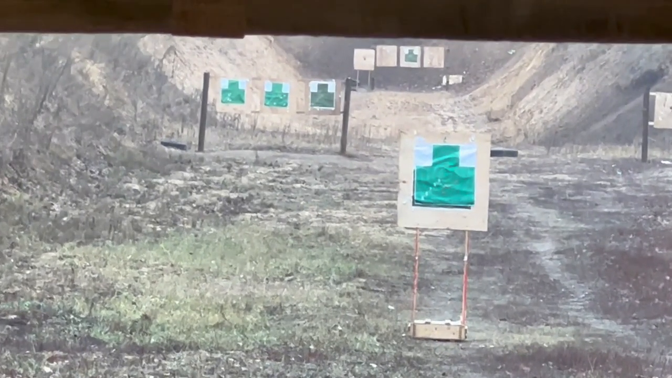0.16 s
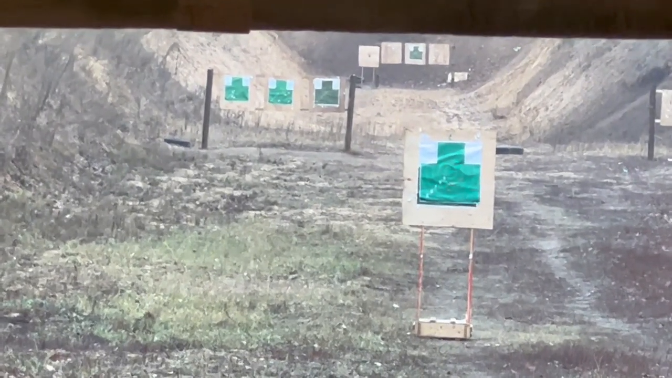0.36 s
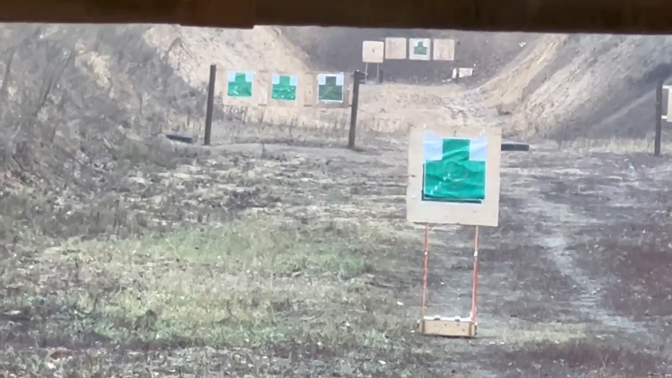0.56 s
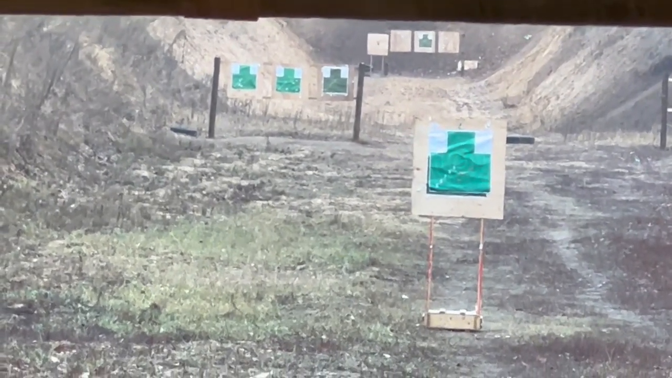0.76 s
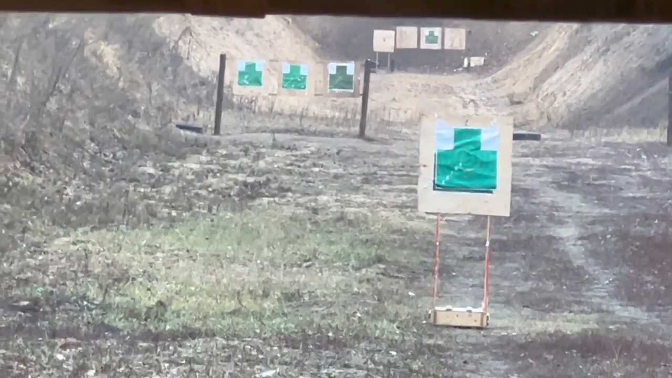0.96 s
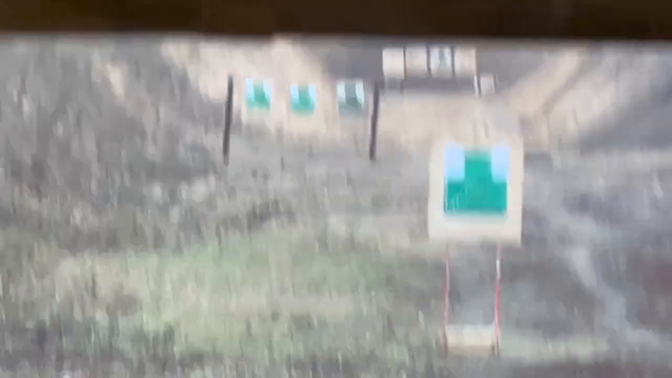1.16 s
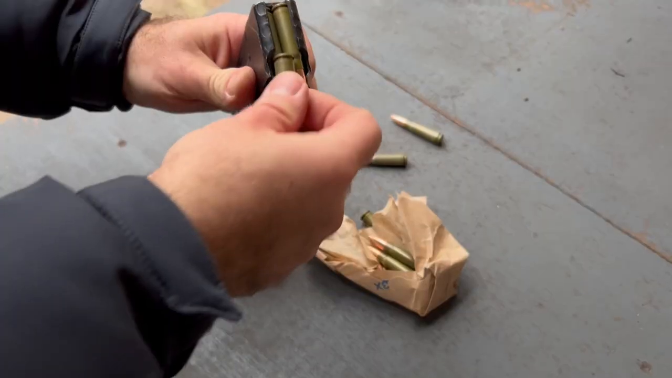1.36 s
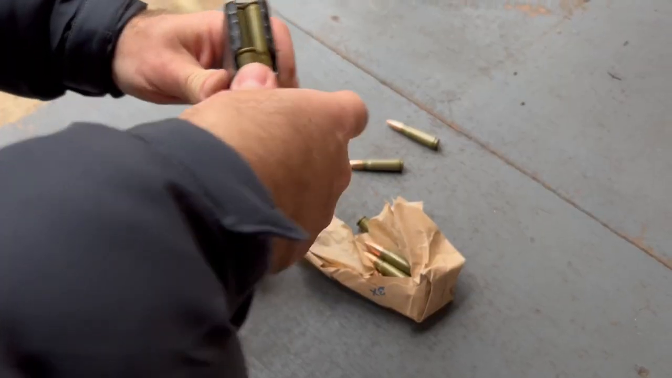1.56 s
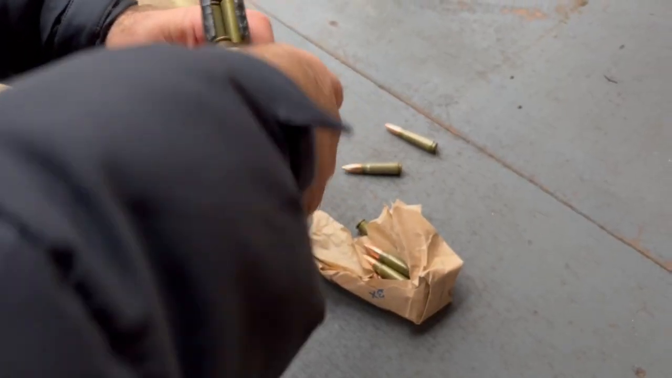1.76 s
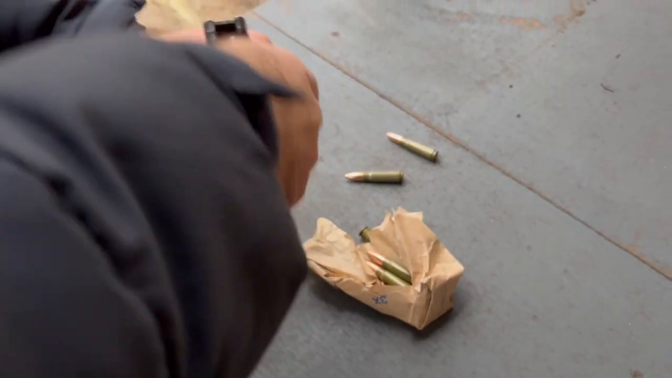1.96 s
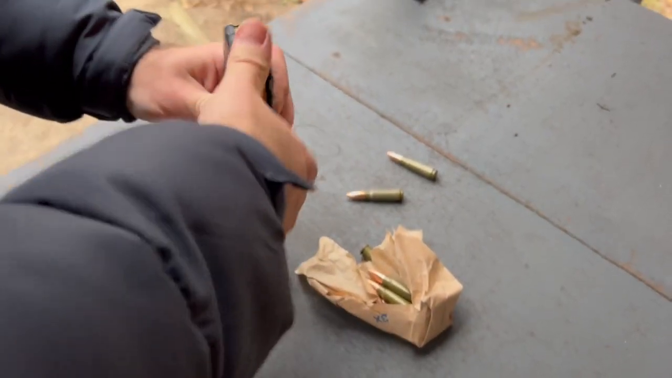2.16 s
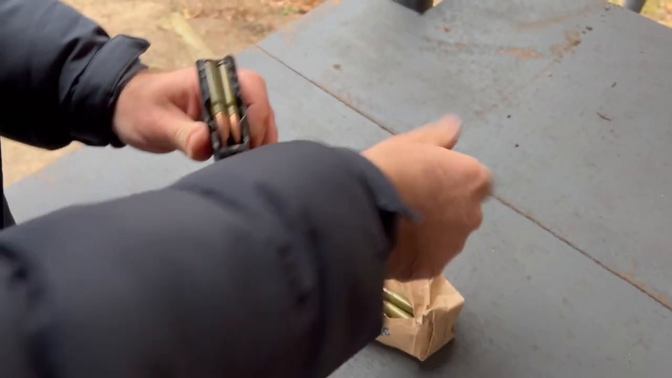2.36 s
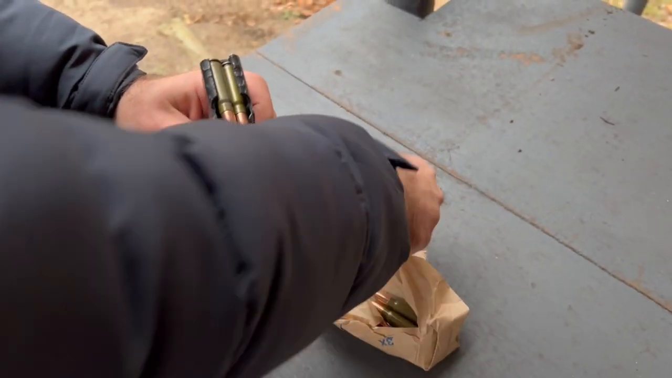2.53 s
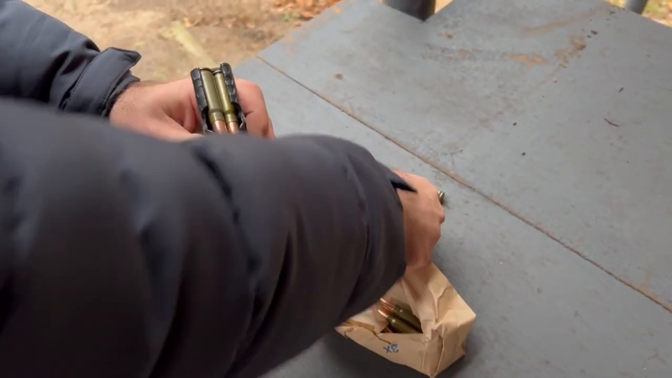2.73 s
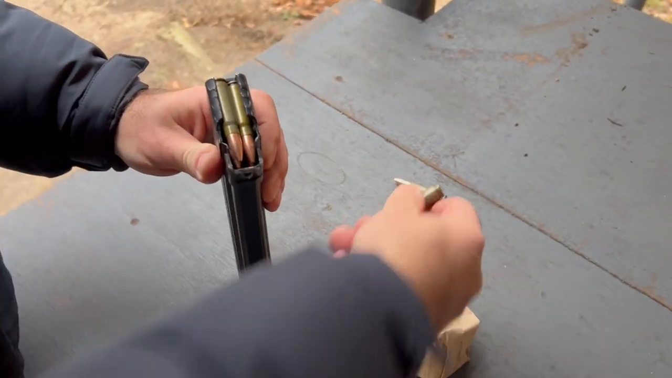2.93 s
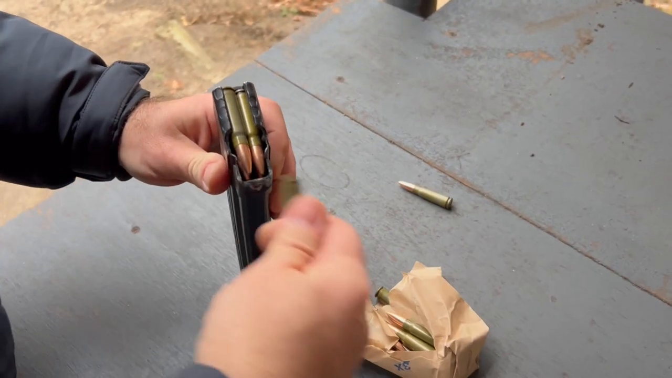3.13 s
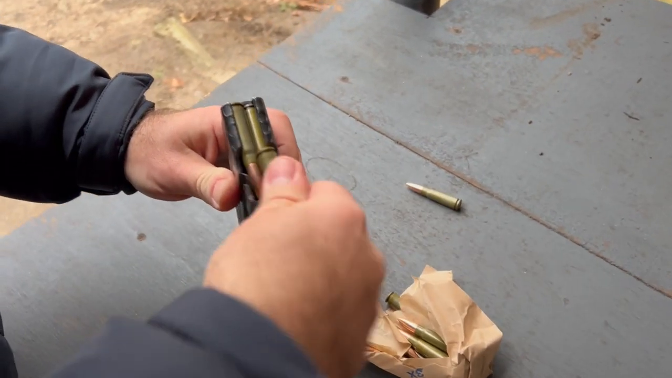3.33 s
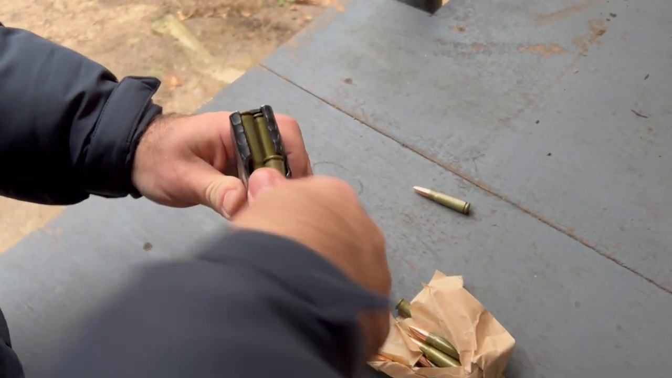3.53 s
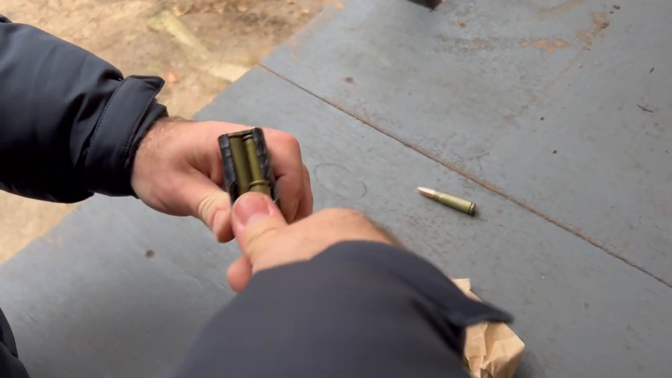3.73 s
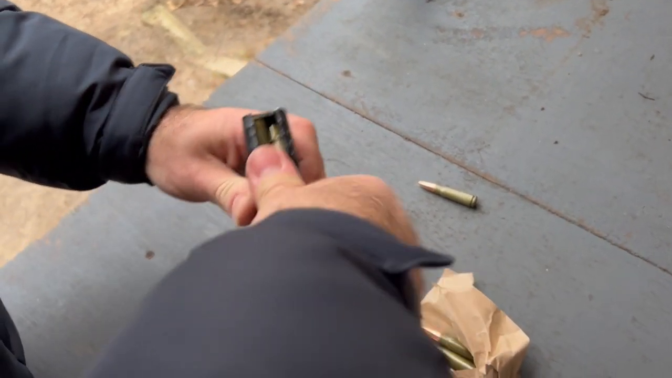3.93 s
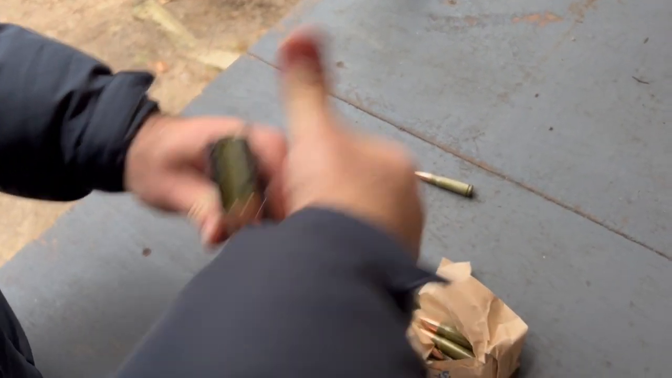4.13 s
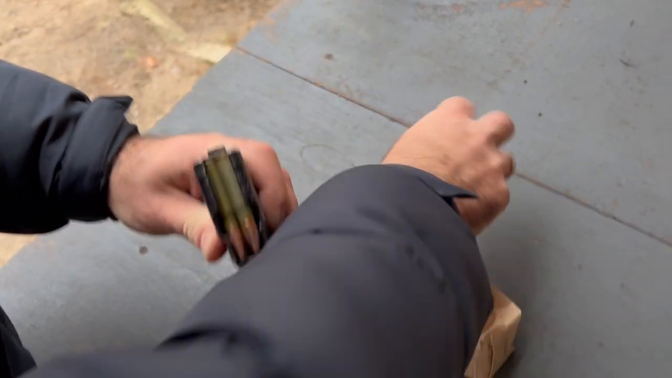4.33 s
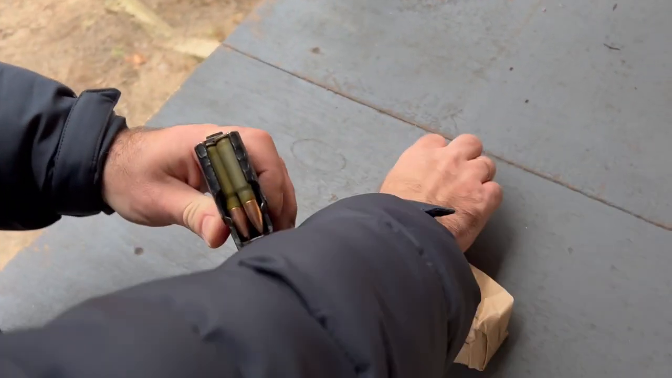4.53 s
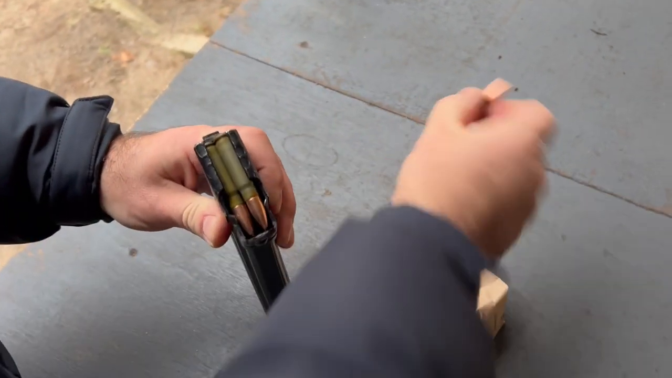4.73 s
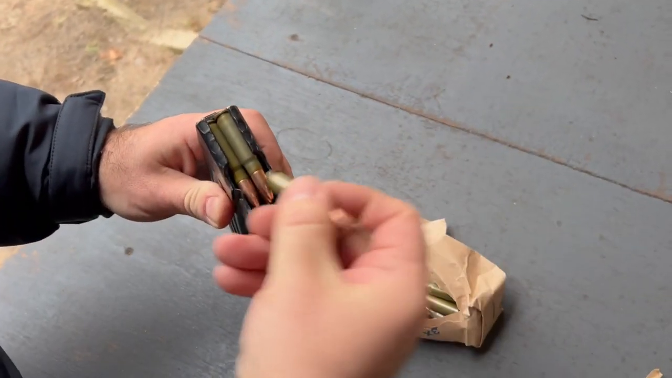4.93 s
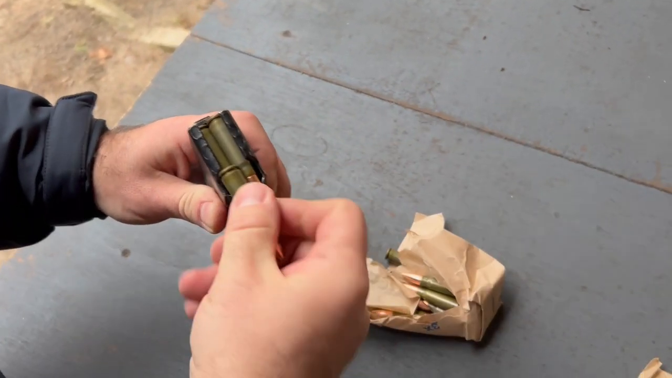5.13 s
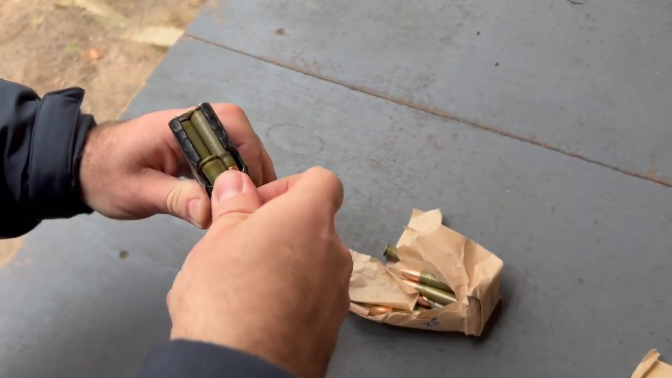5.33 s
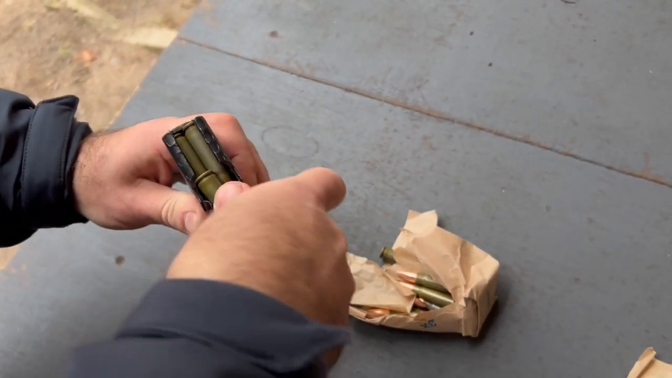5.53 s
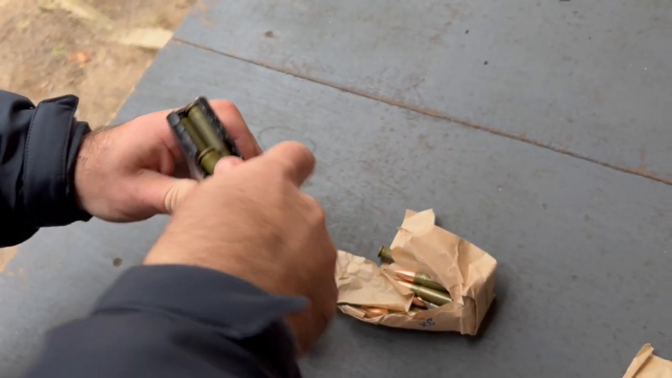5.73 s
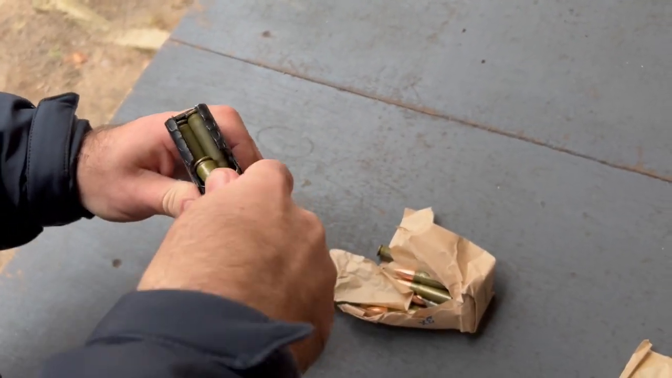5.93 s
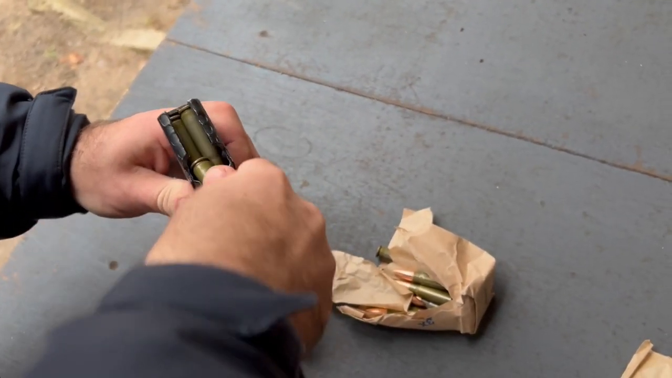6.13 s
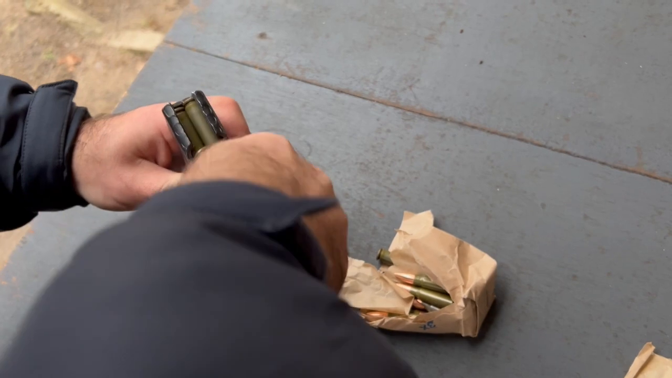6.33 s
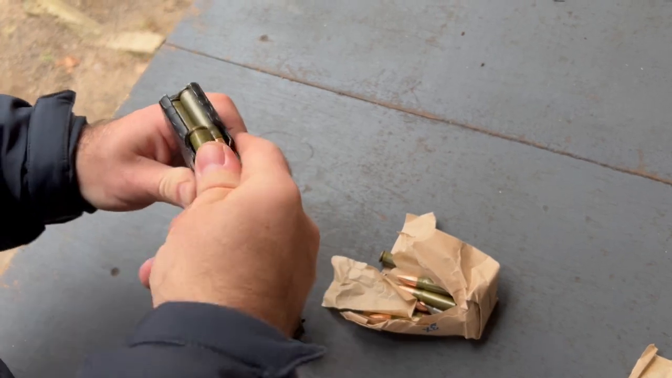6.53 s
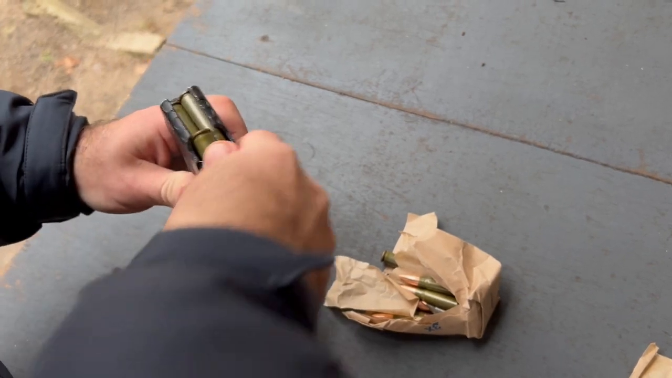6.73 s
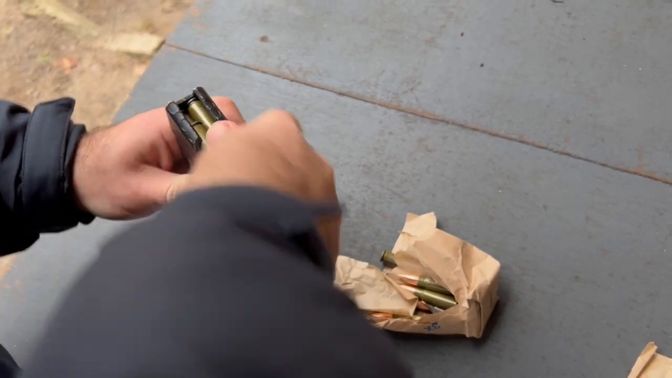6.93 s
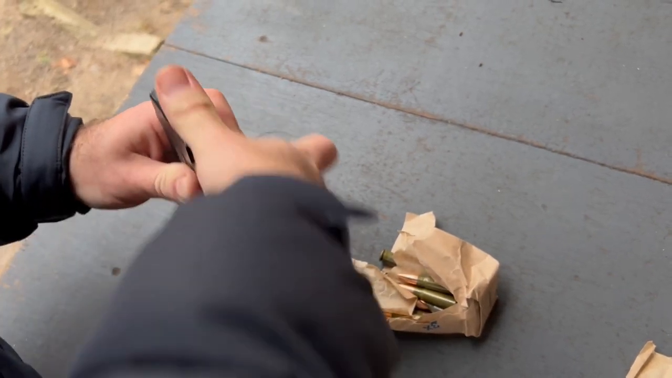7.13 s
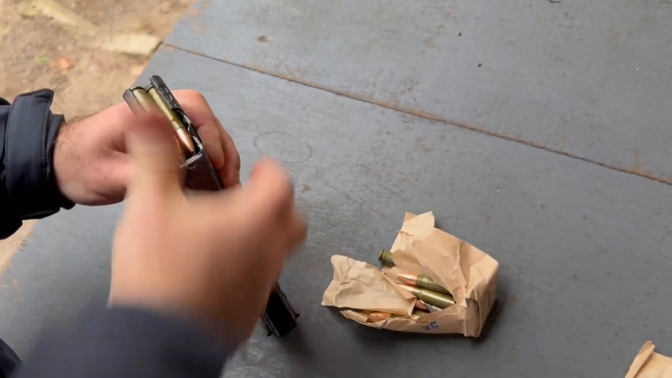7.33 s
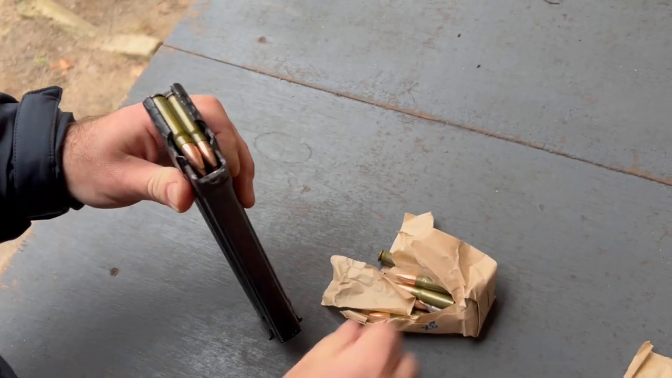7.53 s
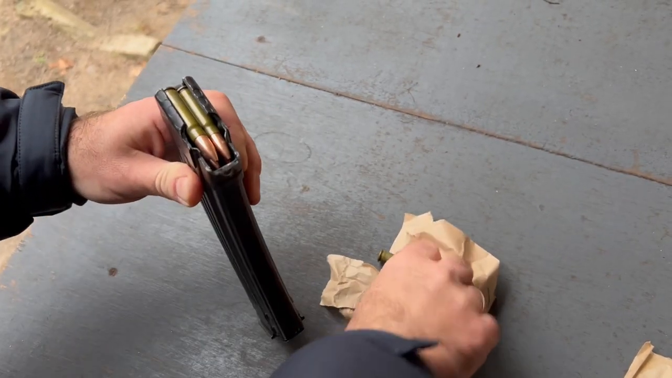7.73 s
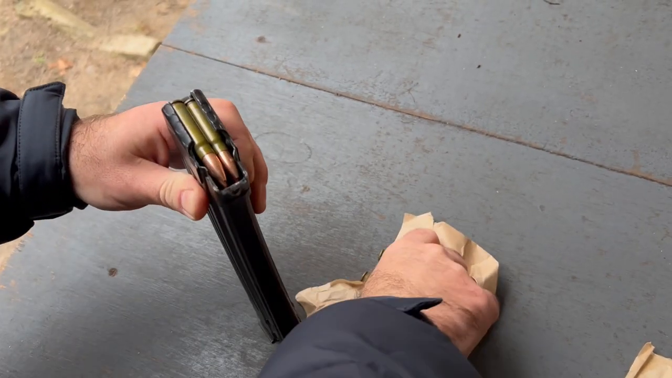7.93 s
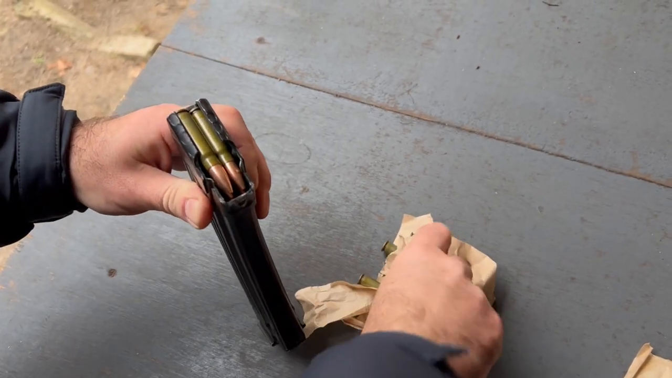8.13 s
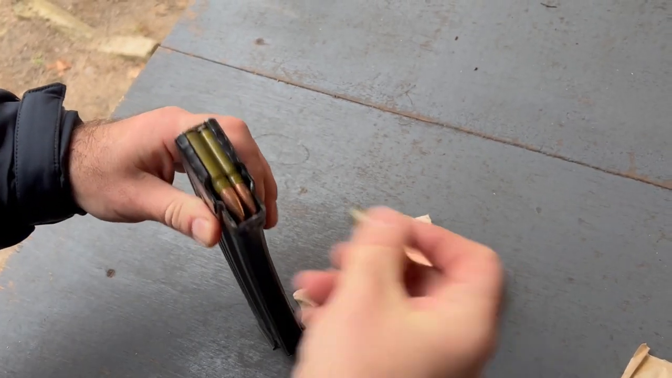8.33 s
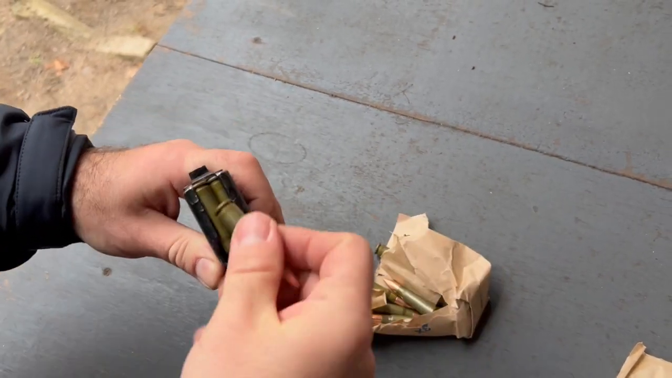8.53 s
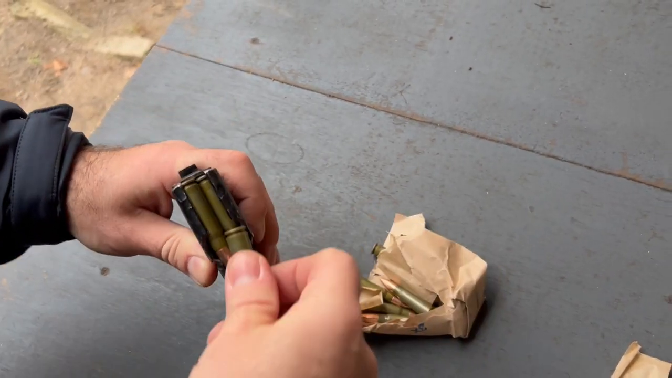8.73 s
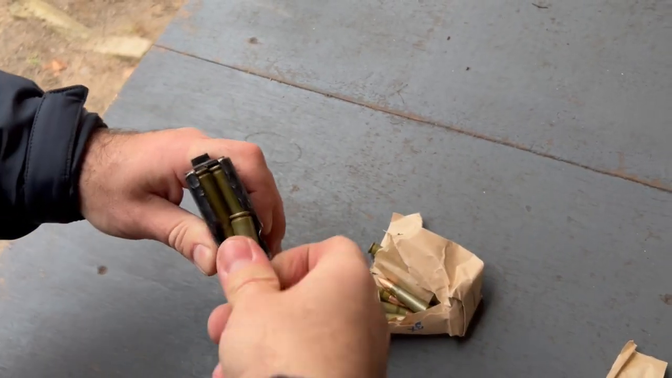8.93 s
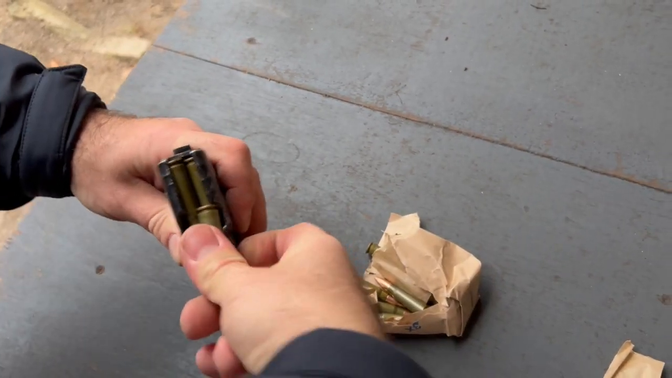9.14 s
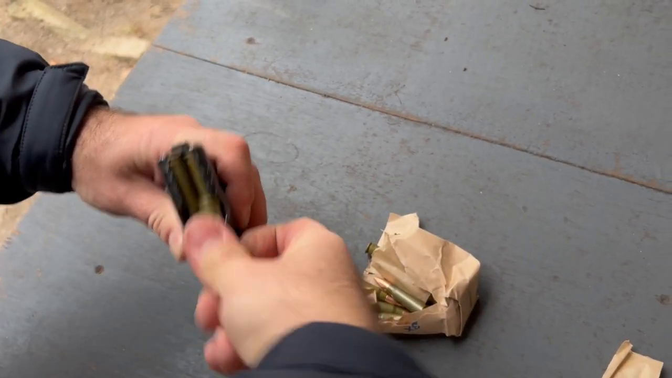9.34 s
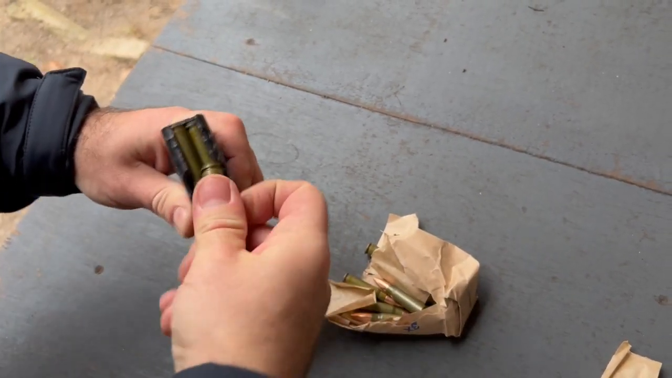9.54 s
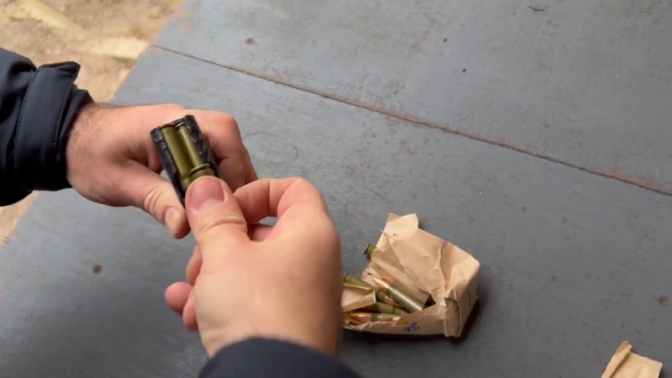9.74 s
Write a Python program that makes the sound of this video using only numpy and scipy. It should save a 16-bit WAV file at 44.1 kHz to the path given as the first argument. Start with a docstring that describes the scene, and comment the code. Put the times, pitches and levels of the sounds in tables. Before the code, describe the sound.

Over a second of near silence holds three faint dull knocks, then cuts abruptly to close handling: brass rounds click and scrape into a steel magazine, with soft thuds on a metal bench and sleeve rustle. A paper packet crackles briefly. A nearby rifle shot overloads the microphone and rolls off earth banks. Loading resumes, with louder paper crackling and more clicks. Close stereo microphone outdoors.

```python
"""Cartridges are thumbed into a steel magazine on a sheet-metal bench at an outdoor range.
Low rumble and sleeve rustle (shaped noise) lie under everything, very faint while three dull knocks sound.
Then brass clicks on steel (tiny knocks set shell tones ringing), the bench thuds (ringing plate tones),
a paper packet crackles (creased panels snap) and things drag (bands of hiss). A rifle shot nearby (pressure
waves and noise) overloads the microphone and rolls back off the earth banks, with a bright tick; loading goes on."""
import sys
import numpy as np
from scipy import signal
from scipy.fft import rfft, irfft, next_fast_len
from scipy.io import wavfile
from scipy.ndimage import uniform_filter1d

SR = 44100
rng = np.random.default_rng(int(sys.argv[2]) if len(sys.argv) > 2 else 0)


def store_wav(level_fs):
    """Save 16-bit WAV to argv[1]."""
    pcm = np.round(np.clip(np.atleast_2d(level_fs), -1, 1) * 32767)
    wavfile.write(sys.argv[1], SR, pcm.T.astype(np.int16))


def voltage_ratio(decibels):
    """Convert decibels (scalar or array-like) to amplitude ratios, 20 dB per decade."""
    exponent = np.asarray(decibels, float) / 20
    return 10 ** exponent


N = 431298   # length in samples
HZ = np.maximum(np.fft.rfftfreq(next_fast_len(N + N % 2), 1 / SR), 1)   # frequencies of the whole-length filters


def rms_one(x):
    """Scale to unit rms, so that a level set afterwards means the same for any noise."""
    return x / np.sqrt(np.mean(x ** 2) + 1e-20)


def noise():
    """White noise: every frequency equally strong."""
    return rng.standard_normal(N)


def in_time(rows, outside=None):
    """Join the points of a curve with straight lines, one value per sample."""
    s, *columns = np.transpose(rows)
    return [np.interp(np.arange(N) / SR, s, c, left=outside, right=outside) for c in columns]


def at_hz(points, hz):
    """Read a table on a log-frequency axis, closer to how we hear pitch."""
    table = np.array(points)
    return np.interp(np.log(hz), np.log(table[:, 0]), table[:, 1])


def filtered(x, response):
    """Change the strength and phase of each frequency in HZ."""
    size = next_fast_len(N + N % 2)
    return irfft(rfft(x, size) * response, size)[:N]


def coloured(x, spectrum):
    """Give a noise-like signal a spectrum."""
    return filtered(x, voltage_ratio(at_hz(spectrum, HZ)))


def band_pass(x, low_hz, high_hz, order=2):
    """Keep mainly the sound between two frequencies."""
    sos = signal.butter(order, [low_hz, high_hz], "band", fs=SR, output="sos")
    return signal.sosfilt(sos, x)


def drift(rate_hz):
    """Slow chance wandering with spread 1, drawn every 40 samples; a higher rate wanders faster."""
    r = np.exp(-80 * np.pi * rate_hz / SR)
    luck = rng.standard_normal(N // 40 + 2002)
    slow = signal.lfilter([1], [1, -2 * r, r * r], luck)[2000:]   # leave out the filter's start-up
    return np.interp(np.arange(N) / 40, np.arange(len(slow)), rms_one(slow))


def ring(drive, hz, t60):
    """A unit click sets a sine of height 1 ringing; it falls by 60 dB in t60 seconds."""
    r, w = voltage_ratio(-60 / (t60 * SR)), 2 * np.pi * hz / SR
    return signal.lfilter([0, np.sin(w)], [1, -2 * r * np.cos(w), r * r], drive + 1e-18)


def struck(modes, drive, uneven_db, detune):
    """Every blow finds the modes with other strengths and, as grip and load change, at slightly other pitches."""
    t, body = np.arange(drive.shape[1]) / SR, np.zeros(drive.shape)
    for hz, mode_db, t60 in modes:
        luck = rng.standard_normal((len(drive), 2))
        tone = np.sin(2 * np.pi * hz * (1 + detune * luck[:, :1]) * t)
        fading = voltage_ratio(mode_db + uneven_db * luck[:, 1:] - 60 * t / t60)
        body += fading * tone
    return signal.fftconvolve(drive, body, axes=1)


def swarms(lengths_ms, rise):
    """Rows of tiny uneven knocks that swell to a peak at 15 ms and die away."""
    t = np.arange(2048) / SR - .015
    span = np.clip(lengths_ms, .2, 14)[:, None] / 1000
    shape = np.exp(-abs(t) / (np.where(t < 0, rise, .55) * span))
    return shape * rng.standard_normal(shape.shape) * voltage_ratio(3.1 * rng.standard_normal(shape.shape))


def placed(times, rows, levels_db, lengths_ms):
    """Lay rows out in time; a level is held for about the length of the contact."""
    out = np.zeros(N + rows.shape[1])
    held = (lengths_ms + 1.5) / 1000 * SR / 2
    size = voltage_ratio(levels_db) * np.sqrt(held / np.sum(rows ** 2, axis=1))
    for s, row, gain in zip(times, rows, size):
        at = round((s - .015) * SR)   # the row peaks 15 ms in
        out[at:at + len(row)] += gain * row
    return out[:N]


# low rumble, very faint at first, stepping up abruptly at 1.35 s: t/s, level/dB
RUMBLE_LEVEL = [(0, -70), (.3, -81), (1.335, -76.5), (1.35, -49), (2.0, -42), (3.2, -52), (4.4, -39.5),
                (4.9, -51), (6.0, -54.5), (7.0, -35), (7.6, -48), (8.7, -44.5), (9.1, -47.5), (9.78, -50.5)]
# its relative spectrum: f/Hz, level/dB
RUMBLE_COLOUR = [(30, -8.5), (70, 0), (200, -8), (400, -21.5), (800, -27), (1500, -27), (3000, -57.5)]


def rumble():
    """Bass-heavy noise whose level wanders slowly."""
    level_db = in_time(RUMBLE_LEVEL)[0] + 2.5 * drift(8)
    return voltage_ratio(level_db) * rms_one(coloured(noise(), RUMBLE_COLOUR))


# fingers and cloth in contact: t/s, level/dB
RUSTLE_LEVEL = [(0, -104), (.5, -92), (1.335, -74), (1.36, -56), (3.22, -60), (3.28, -74.5), (3.5, -58.5),
                (4.6, -71), (5.9, -66), (6.23, -72), (6.38, -59), (7.1, -57.5), (7.52, -59), (8.5, -51.5),
                (9.0, -64.5), (9.3, -64), (9.36, -76), (9.42, -60), (9.78, -61)]
# their relative spectrum: f/Hz, level/dB
RUSTLE_COLOUR = [(300, -20), (600, -9.5), (1100, -11), (1700, -18.5), (2500, -11), (4200, -15), (5000, -16),
                 (5600, -9.5), (8000, -11.5), (11500, -18.5), (13000, -23.5), (16000, -43)]
# a sleeve brushes past: peak t/s, level/dB, half length/s
SWISHES = [(2.376, -59.5, 0.2), (1.8, -56.5, 0.12), (7.406, -48.5, 0.061), (7.64, -52, 0.051)]


def rustle():
    """A bed of cloth and skin noise; each brush of a sleeve swells and fades."""
    t = np.arange(N) / SR
    level = voltage_ratio(in_time(RUSTLE_LEVEL)[0])
    for s, peak_db, half in SWISHES:
        level += voltage_ratio(peak_db) * np.exp(-((t - s) / half) ** 2)
    return level * voltage_ratio(1.2 * drift(20)) * rms_one(coloured(noise(), RUSTLE_COLOUR))


# three quiet, dull knocks, perhaps muffled shots: t/s, level/dB (relative)
KNOCKS = [(0.538, -24), (0.753, -28), (1.008, -19.5)]
# their short tones: f/Hz, level/dB (relative), t60/s
KNOCK_TONES = [(1220, -17, 0.2), (2654, -1, 0.043)]


def dull_knocks():
    """Quiet, dull knocks: a short noise burst, a short tone and a haze of noise behind each."""
    s, knock_db = np.transpose(KNOCKS)
    ms = 3.9 + 0 * s
    drive = np.pad(swarms(ms, rise=.3), [(0, 0), (0, 6000)])
    burst = placed(s, drive, knock_db - 10.5, ms)
    t = np.arange(8000) / SR
    haze_tail = rng.standard_normal(len(t)) * voltage_ratio(-38.0 - 60 * t / 0.18)
    haze = signal.fftconvolve(burst, haze_tail)[:N]
    # the tone of a louder knock is much louder: 4 dB for each dB
    loudest_db = knock_db.max()
    tone_db = loudest_db - 19 + 4.0 * (knock_db - loudest_db)
    tones = struck(KNOCK_TONES, drive, uneven_db=-2, detune=0.0016)
    return band_pass(burst + haze, 1000, 9000) + placed(s, tones, tone_db, ms)


# brass on steel, the clear contacts: t/s, level/dB, treble re level/dB, rattle/ms
CLICKS = [(1.3563, -35, 11, 2.9), (1.3672, -26.5, 4, 3.1), (1.386, -14, -2, 2.2), (1.49, -22.5, -16, 2.4),
          (1.508, -16, -15, 2.7), (1.545, -24, -18, 5.9), (1.5669, -22, -14.5, 3.2),
          (1.6029, -26, -11.5, 14), (1.6183, -16, -11.5, 0.53), (1.654, -25, -19, 2.1),
          (1.689, -15, -12, 1.7), (1.6998, -20.5, -3, 5.5), (1.829, -26, -8.5, 1.8),
          (1.8989, -31, -18, 3.9), (1.921, -10.5, -14.5, 4.5), (1.9318, -9.5, -2.5, 6.4),
          (1.9434, -6, -6.5, 2.2), (1.9608, -7.5, -19.5, 5.9), (2.0321, -23.5, -8.5, 11),
          (2.0843, -17.5, -13, 2), (2.099, -10, -4, 6.2), (2.113, -17, -6, 5.2), (2.151, -23, -11, 2.9),
          (2.1759, -13, -16, 4.9), (2.192, -16, -12.5, 2), (2.276, -18.5, -10.5, 5.7),
          (2.2932, -11.5, 1, 1.2), (3.3334, -28.5, -5, 2.3), (3.355, -37.5, -10, 6),
          (3.3932, -24.5, 2, 2.7), (3.4016, -10.5, 3, 3), (3.415, -22, 1.5, 3), (3.4538, -20.5, -7.5, 1.1),
          (3.473, -18, -11, 3), (3.514, -21, -12, 5.7), (3.5376, -19, -29.5, 4.9),
          (3.5602, -27.5, -16, 2.9), (3.7071, -18.5, 0, 2), (3.8632, -16.5, -8, 4.7), (3.8741, -23, 4, 1.5),
          (3.8816, -13.5, 5.5, 2.6), (5.0786, -31.5, -1, 4.3), (5.0944, -24.5, -7, 2.2),
          (5.175, -27.5, -17.5, 3.4), (5.2406, -35.5, -14.5, 2), (5.297, -25, -4.5, 5.8),
          (5.501, -38, -8, 3), (5.593, -21, -11, 1.9), (5.7176, -40.5, -10, 2), (5.9829, -28.5, -20, 5.3),
          (5.9926, -23, -11, 2.05), (6.042, -24, -6, 1.9), (6.05, -18.5, -5.5, 1.5),
          (6.0612, -19, -7.5, 3.2), (6.1029, -13, -15, 3.9), (6.1774, -33, -17.5, 4.6),
          (6.4304, -19.5, -23.5, 1.8), (6.4693, -23, -11, 3.8), (6.516, -21.5, 1.5, 2.6),
          (6.5315, -20.5, 3, 6.4), (6.5435, -9, -0.5, 6.5), (6.5783, -27, -6, 5.3), (6.6353, -22, -7, 2.5),
          (6.6523, -24.5, -16.5, 5.8), (6.737, -33, -5, 2.8), (6.803, -16, -10, 1.6),
          (6.8282, -17, -6, 3.8), (6.8504, -17.5, -7.5, 8.3), (6.866, -9.5, -7.5, 3.4),
          (6.8804, -7, -3.5, 15), (6.9, -15, -2.5, 1), (6.972, -17.5, -4.5, 3.3), (6.983, -15, -3, 4.8),
          (6.995, -9.5, -5, 3.2), (7.014, -17.5, -9, 4.1), (7.029, -11, -5.5, 1.6),
          (7.0425, -26.5, -15.5, 2.5), (7.1364, -7, -0.5, 1.9), (7.204, -29.5, -5, 2.7),
          (7.234, -24.5, -19, 3.1), (7.2712, -27, -27.5, 1.1), (8.5351, -38, 8.5, 0.98),
          (8.5438, -20, 16.5, 2), (8.5601, -14.5, 5.5, 2.3), (8.7231, -15, -1, 2.4), (8.7341, -10, 2, 4.1),
          (8.7527, -18, -4.5, 7.3), (8.807, -16.5, -13.5, 2.4), (8.8466, -23, -4.5, 1.7),
          (8.86, -32.5, -12, 3), (8.888, -24.5, -13, 5.5), (8.898, -23, -17, 2.7), (8.9235, -11.5, -3.5, 4),
          (8.958, -32.5, 10, 1.5), (9.094, -41.5, -6.5, 6.4), (9.2058, -35, -6.5, 1.6),
          (9.608, -19.5, 5.5, 4.7), (9.6188, -9.5, 1.2, 9.5), (9.6639, -25, -2.5, 1.1),
          (9.708, -19, -7.5, 5.8), (9.7544, -30, -13.5, 4.7)]


def contacts():
    """The clear contacts; after each one the round rocks back once, as a weaker contact."""
    s, level_db, treble_db, ms = np.transpose(CLICKS)
    luck = rng.standard_normal((len(s), 3))
    later = s + 0.011 * np.exp(0.23 * luck[:, 0])   # about 11 ms on
    weaker_db = level_db - 21 + 6.5 * luck[:, 1]
    later_treble_db = -9.5 + 4.0 * luck[:, 2]
    return (np.r_[s, later], np.r_[level_db, weaker_db],
            np.r_[treble_db, later_treble_db], np.r_[ms, 9.1 + 0 * s])


# tones of the magazine shell and follower spring: f/Hz, level/dB (relative), t60/s
MAGAZINE_MODES = [(1207, -3.5, 0.062), (1328, -0.5, 0.019), (1478, 9, 0.012), (2020, -1.5, 0.014),
                  (2407, 6, 0.0089), (2800, -3, 0.0086), (3987, 2.5, 0.0048), (5914, 5.5, 0.0029),
                  (6910, 1.5, 0.0034), (7840, 3.5, 0.0021)]
# air inside the magazine: f/Hz, level/dB (relative), t60/s
HOLLOW = [(509.5, -3, 0.072), (615, -4.5, 0.021), (874, -1.5, 0.021)]


def magazine():
    """Shell modes over a dry clack, upper modes under a bright scratch of brass, a faint hollow knock below."""
    s, level_db, treble_db, ms = contacts()
    drive = swarms(ms, rise=0.5)
    # bright contacts favour the middle tones over the lowest: 0.39 dB for each dB of treble
    tilt = np.sqrt(voltage_ratio(0.39 * (treble_db - treble_db.mean())))[:, None]
    lowest = struck(MAGAZINE_MODES[:3], drive, uneven_db=4.0, detune=.02)
    middle = struck(MAGAZINE_MODES[3:6], drive, uneven_db=4.0, detune=.02)
    shell = lowest / tilt + middle * tilt
    upper = struck(MAGAZINE_MODES[6:], drive, uneven_db=4.0, detune=.03)
    clack = voltage_ratio(26.0) * band_pass(drive, 1100, 3600)
    scratch = voltage_ratio(12.5) * band_pass(drive, 3400, 11000)
    shell[:, :drive.shape[1]] += clack
    upper[:, :drive.shape[1]] += scratch
    steel = placed(s, shell, level_db, ms) + placed(s, upper, level_db + treble_db, ms)
    # a small shell radiates little below its first mode
    thin = np.r_[signal.butter(7, 1090, "high", fs=SR, output="sos"),
                 signal.butter(3, 11500, fs=SR, output="sos")]
    knock = struck(HOLLOW, drive, uneven_db=4.0, detune=0.037)
    knock_db = level_db - 16.0 + rng.normal(0, 5.1, len(s))
    return signal.sosfilt(thin, steel) + placed(s, knock, knock_db, ms)


# relative spectrum of the reflections: f/Hz, level/dB
REFLECTIONS = [(400, -9.5), (950, -18.5), (1250, 7), (1650, -8.5), (2350, -0.5), (4000, -9.5), (5000, -13),
               (6300, -10), (10000, -23), (13000, -41.5)]


def shelter(x):
    """Dense reflections from bench top and roof: noise that follows the energy of the source and dies away."""
    keep = voltage_ratio(-120 / (.13 * SR))   # energy falls by 60 dB in 0.13 s
    energy = signal.lfilter([1 - keep], [1, -keep], x ** 2)
    level = voltage_ratio(-11.0) * np.sqrt(energy) * voltage_ratio(2.9 * drift(70))
    return level * rms_one(coloured(noise(), REFLECTIONS))


# pushes that reach the bench: t/s, level/dB, deep tone re level/dB
THUDS = [(1.566, -25, -6), (1.687, -19, -15), (1.8, -24.5, -11.5), (1.941, -12, -28.5), (2.101, -12, -26),
         (2.152, -21, -14.5), (2.295, -18.5, -43), (3.538, -23.5, -0.5), (3.87, -16, -17),
         (5.594, -23.5, -7.5), (6.102, -15, -3.5), (6.543, -14, -6.5), (6.826, -24, -21.5),
         (6.872, -13, -22), (6.996, -10, -39), (7.336, -31.5, -9), (7.777, -19.5, -8), (8.627, -39.5, 15.5),
         (8.747, -35, 8.5), (8.9, -22.5, -5.5), (9.623, -16.5, -2.5)]
# tones of the bench, deepest first: f/Hz, level/dB (relative), t60/s
BENCH_MODES = [(69.6, -2, 0.36), (140.6, -10.5, 0.35), (216, 4.5, 0.06), (323.3, -14.5, 0.22)]


def bench():
    """Soft pushes knock the top plate at pitches that shift with the load; the deepest mode answers late and wavers."""
    s, push_db, deep_db = np.transpose(THUDS)
    ms = 5.1 + 0 * s
    drive = np.pad(swarms(ms, rise=.3), [(0, 0), (0, 10000)])
    tones = struck(BENCH_MODES[1:], drive, uneven_db=2.5, detune=.07)
    plate = placed(s, tones, push_db - 1.5, ms)
    hz, mode_db, t60 = BENCH_MODES[0]
    push = np.zeros(N)
    late = np.round((s + .009) * SR).astype(int)   # 9 ms late
    push[late] = voltage_ratio(push_db + mode_db + deep_db)
    deep = ring(push, hz, t60) * voltage_ratio(2.9 * drift(24))
    return signal.sosfilt(signal.butter(2, 450, fs=SR, output="sos"), plate + deep)


def small_snaps(level, count):
    """Chance snaps fall where the crinkling is busy and follow its level."""
    share = np.cumsum(np.sqrt(level))
    at = np.searchsorted(share / share[-1], (np.arange(count) + rng.random(count)) / count)
    luck = rng.uniform(-1.2, 1, (count, 3))
    level_db = 20 * np.log10(level[at]) - 1.5 + 4.0 * luck[:, 0]
    treble_db = -2.5 + 5.0 * luck[:, 1]
    pitch_hz = 2500 * 2 ** (.7 * luck[:, 2])
    return np.c_[at / SR, level_db, treble_db, 1.6 + 0 * at, pitch_hz]   # each 1.6 ms long


# the loud paper snaps: t/s, level/dB, treble re level/dB, length/ms, pitch of the creased panel f/Hz
SNAPS = [(2.707, -26.5, -25.5, 1.5, 1460), (2.7256, -33, -21, 2.4, 1940), (2.7836, -37.5, -11, 2.2, 2390),
         (7.748, -38, -10.5, 2.8, 1480), (7.7787, -20.5, -4.5, 13, 2194), (7.808, -25, -8, 3, 3020),
         (7.8243, -27.5, 6.5, 1.2, 3030), (7.8395, -16, -8.5, 1.7, 2820), (7.849, -16.5, 1.5, 1.8, 3020),
         (7.8653, -19.5, -7, 1.2, 2860), (7.902, -35, 2.5, 1.8, 3550), (7.982, -30.5, -2, 2, 3250),
         (8.0197, -19.5, -12.5, 2.7, 3850), (8.0314, -31.5, 2, 2.9, 3890), (8.1304, -35.5, 4, 9.4, 3320),
         (8.187, -35, -4.5, 2.7, 3180), (8.218, -31.5, -3.5, 1.5, 3300), (8.227, -29.5, -19.5, 1.3, 1520),
         (8.279, -36.5, 2, 1.9, 1750)]
# two spells of crinkling, each a curve: t/s, level/dB
CRINKLE = [
    [(2.58, -67.5), (2.65, -36.5), (2.78, -41), (2.8, -52), (2.88, -48.5), (2.92, -69)],
    [(7.74, -49.5), (7.85, -32), (7.94, -52.5), (8.04, -36.5), (8.1, -47), (8.2, -46.5), (8.26, -51),
     (8.45, -56)],
]
# relative spectrum of the crinkling: f/Hz, level/dB
PAPER_COLOUR = [(300, -6.5), (550, -6), (3800, -14), (5000, -19), (6500, -11.5), (10700, -22.5),
                (13000, -24.5), (16000, -53)]


def paper():
    """Lone snaps of creased panels over clumps of small creases."""
    level = sum(voltage_ratio(in_time(span, outside=-140)[0]) for span in CRINKLE)
    snaps = np.r_[SNAPS, small_snaps(level, count=30)]
    s, level_db, treble_db, ms, pitch_hz = np.transpose(snaps)
    drive = swarms(ms, rise=.45)
    # creased panels ring a few cycles
    sheet = [(hz, 4.2 * np.log2(hz / 1000), 13.0 / hz) for hz in np.geomspace(900, 4300, num=7)]
    body = struck(sheet, drive, uneven_db=4.0, detune=.1)
    reach = 2 ** 0.65   # a panel sounds 0.65 octave to either side of its pitch
    body = np.array([band_pass(row, hz / reach, hz * reach) for hz, row in zip(pitch_hz, body)])
    edge = band_pass(drive, 5300, 11500, order=3)
    born = rng.random(N) < 1000 * voltage_ratio(7 * drift(25)) / SR   # chance of a crease, in clumps
    size = voltage_ratio(4.8 * np.minimum(rng.exponential(1, N), 5))
    creases = born * size * rng.choice([-1, 1], N)
    crinkling = level * rms_one(coloured(creases, PAPER_COLOUR))
    return placed(s, body, level_db, ms) + placed(s, edge, level_db + treble_db, ms) + crinkling


# a case slips along the lips, a hand drags on bench or paper:
# start t/s, level/dB, hold/s, centre f/Hz, width/octaves
SLIDES = [(3.576, -35.5, 0.016, 4300, 1.5), (7.768, -30, 0.015, 750, 1.1), (8.025, -40, 0.05, 1000, 1.8),
          (8.135, -41, 0.092, 1500, 1.6), (8.57, -41, 0.14, 4200, 1.1), (8.585, -47, 0.11, 260, 1.0)]


def slide():
    """Something drags over a surface: slightly grainy hiss in one band that starts fast, holds and fades."""
    attack_s, fall_db_per_s = .006, 255
    t, out = np.arange(N) / SR, np.zeros(N)
    grain = noise() * voltage_ratio(4.0 * drift(120))
    for s, level_db, hold, hz, octaves in SLIDES:
        hiss = rms_one(band_pass(grain, hz * 2 ** (-octaves / 2), hz * 2 ** (octaves / 2)))
        start = np.clip((t - s) / attack_s, 0, 1)
        fade = voltage_ratio(level_db - fall_db_per_s * np.maximum(t - s - hold, 0))
        out += start * fade * hiss
    return out


# bullet crack and its returns: t/s, level/dB, length/ms
CRACKS = [(3.938, -14, 2.5), (3.9858, -8, 3.7)]
# bursts of scattered sound: t/s, level/dB, t60/s
ROAR = [(3.94, -19.5, 1), (3.984, -14, 0.037), (3.991, -16.5, 0.22), (4.003, -15, 0.26)]
# relative spectrum of the roar: f/Hz, level/dB
ROAR_COLOUR = [(40, -34), (100, -9), (190, 0.5), (350, -9), (600, -8.5), (1000, -16), (3000, -25.5),
               (8000, -32), (11000, -44), (16000, -74.5)]
# pressure fronts: muzzle blast, ground, roof and bank returns: t/s, peak level/dB, length/ms
FRONTS = [(3.977, 6, 1.2), (3.980, 1, 3.8), (3.9882, -1.5, 3), (4.0095, -4, 4), (4.0146, -4.5, 4.5),
          (4.0273, -9.5, 4.9), (4.345, -16.5, 2.6), (4.528, -19.5, 2.2)]


def shot():
    """The crack rattles and a rush swells ahead of the N-shaped fronts (one sine cycle each), amid scattered roar."""
    fronts, roar_level, t = np.zeros(N), np.zeros(N), np.arange(N) / SR
    for s, peak_db, ms in FRONTS:
        phase = (t - s) * 2000 / ms   # -1 to 1 over the length of the front
        fronts += voltage_ratio(peak_db) * np.where(abs(phase) < 1, np.sin(np.pi * phase), 0)
    for s, level_db, t60 in ROAR:
        fading = voltage_ratio(level_db - 60 * np.maximum(t - s, 0) / t60)
        roar_level += np.where(t > s, fading, 0)
    s, level_db, ms = np.transpose(CRACKS)
    cracks = placed(s, band_pass(swarms(ms, rise=0.56), 1200, 6500), level_db, ms)
    rush = rms_one(band_pass(noise(), 450, 1300))
    swell = voltage_ratio(np.interp(t, [3.942, 3.976], [-23, -19.5], left=-140, right=-140))   # seconds, dB
    roar = roar_level * rms_one(coloured(noise(), ROAR_COLOUR))
    return fronts + cracks + swell * rush + roar


# relative spectrum of the echo before the air dulls it: f/Hz, level/dB
ECHO_COLOUR = [(60, -24), (230, -1.5), (400, -2), (800, -3.5), (2300, -6.5), (3400, -15.5), (8300, -27.5),
               (11400, -47.5), (13000, -64.5)]


def echo():
    """The roll off the banks, in third-octave noise; the longer the path, the more treble the air has taken."""
    start_s, peak_s, rise_s, air_db_per_khz_s = 4.05, 4.435, 0.2, 13
    start = round(start_s * SR)
    out, t = np.zeros(N), np.arange(N) / SR - peak_s
    edges = 50 * 2 ** (np.arange(26) / 3)
    after_peak = np.maximum(t, 0)
    rolling = rms_one(coloured(noise(), ECHO_COLOUR))[start:]
    for low, high in zip(edges, edges[1:]):
        band = band_pass(rolling, low, high, order=1)
        khz = np.sqrt(low * high) / 1000
        out[start:] += band * voltage_ratio(-air_db_per_khz_s * khz * after_peak[start:])
    rise_db = -6.0 * (np.minimum(t, 0) / rise_s) ** 2
    # the banks swell to a rounded peak and die; far slopes answer lower and longer (falls in dB per second)
    banks = voltage_ratio(-31.5 - 43 * (np.hypot(after_peak, .15) - 0.2175))
    slopes = voltage_ratio(-36.5 - 4.5 * after_peak)
    return voltage_ratio(rise_db + 1.0 * drift(8.7) + 1.1 * drift(60)) * np.hypot(banks, slopes) * out


# a short bright tick in the echo, like a return of the crack: t/s, level/dB, length/ms
TICK = (4.421, -17.5, 2.5)
# its three brief tones: f/Hz, level/dB (relative), t60/s
TICK_TONES = [(2950, 0, 0.02), (3950, -9, 0.018), (5250, -15, 0.015)]


def bright_tick():
    """A short bright tick: a tiny noise burst sets three brief tones sounding."""
    s, level_db, ms = np.transpose([TICK])
    tones = struck(TICK_TONES, swarms(ms, rise=.5), uneven_db=0.0, detune=0.0085)
    return placed(s, tones, level_db, ms)


# sound arriving from all round, opposite in the two ports: f/Hz, level re direct/dB
SPREAD = [(60, -26), (200, -28), (400, -13), (800, -3.5), (1300, -22), (3000, -5.5), (5500, -9),
          (7500, -26), (11000, -2), (15000, 15)]


def scattered(x, spread_s):
    """The same sound by other paths: each frequency arrives a little later or sooner."""
    delay = uniform_filter1d(rng.standard_normal(len(HZ)), size=1500)
    step_hz = HZ[10] / 10
    phase = np.cumsum(1.5 + rms_one(delay)) * 2 * np.pi * spread_s * step_hz
    return filtered(x, voltage_ratio(at_hz(SPREAD, HZ)) * np.exp(-1j * phase))


# the left port mostly trails the right in the treble: f/Hz, lead of the left/rad
PORT_PHASE = [(300, 0.), (1200, .45), (2500, .1), (4500, -.8), (5600, .3), (7000, -.3), (9000, -1.0),
              (11000, -1.9), (13000, -2.5), (16000, -2.2)]


def port_lead(x):
    """The part that, added left and taken off right, turns the phase between the two ports."""
    return filtered(x, 1j * np.tan(at_hz(PORT_PHASE, HZ) / 2))


def scene():
    """All sources as the part common to the two ports, plus what differs between the ports."""
    hands = magazine() + paper()
    near = dull_knocks() + hands + bench() + shot() + bright_tick()
    far = rumble() + rustle() + shelter(hands) + slide() + echo()
    apart = port_lead(near + far) + scattered(near, spread_s=0.00019) + scattered(far, spread_s=0.025)
    return near + far + apart * [[1], [-1]]


def roll_off(x):
    """The treble ends steeply here."""
    return signal.sosfilt(signal.butter(12, 16420, fs=SR, output="sos"), x)


def record(dry):
    """The microphone loses the deepest bass and, when overloaded, flattens the peaks."""
    cut = signal.sosfilt(signal.butter(3, 45, "high", fs=SR, output="sos"), dry)
    mix = 1.179 * np.tanh(cut / 1.21)
    return roll_off(mix)


dry = scene()
out = record(dry)
store_wav(out)
```